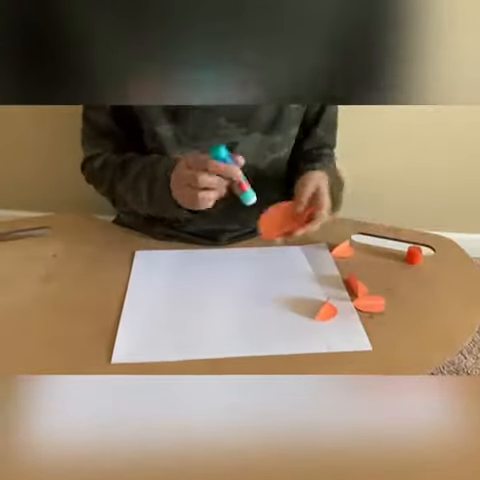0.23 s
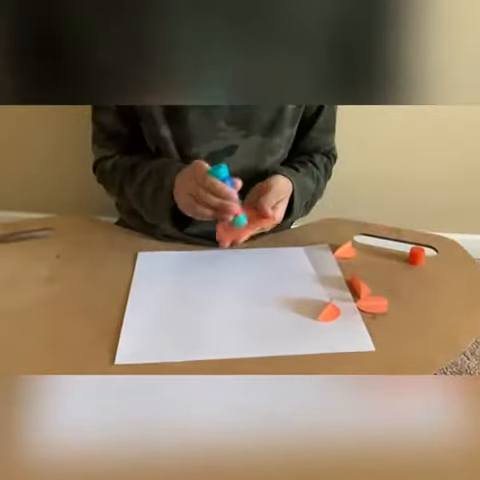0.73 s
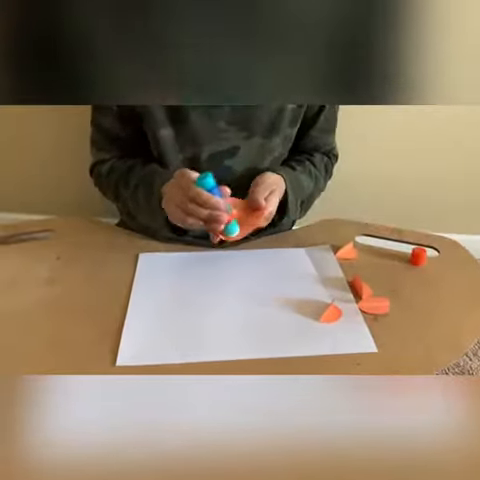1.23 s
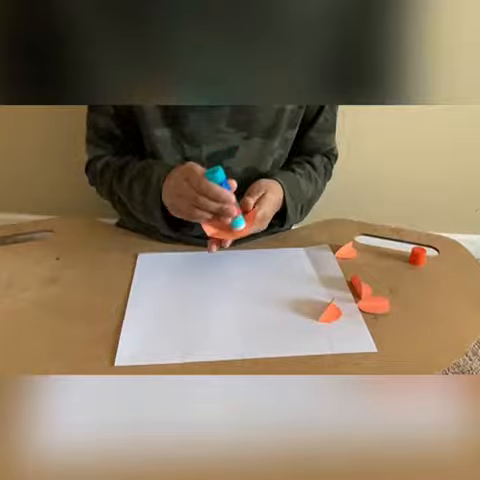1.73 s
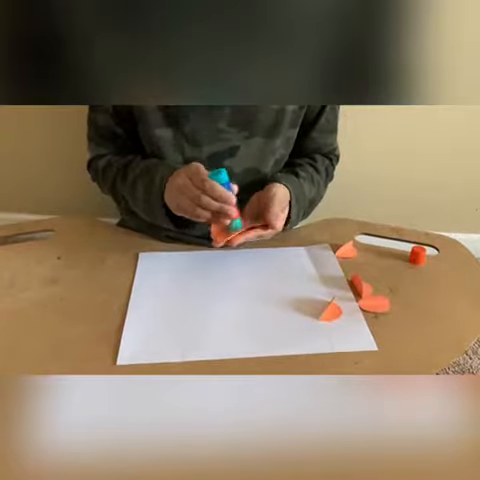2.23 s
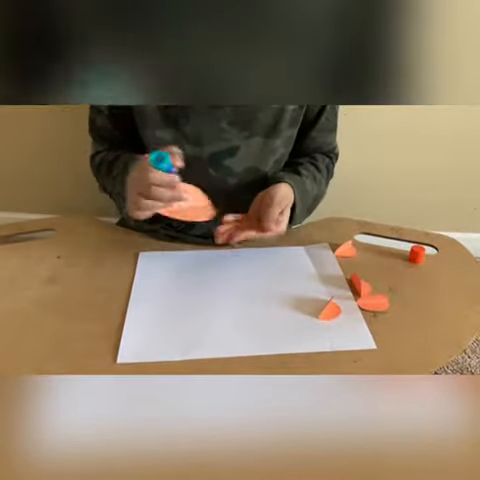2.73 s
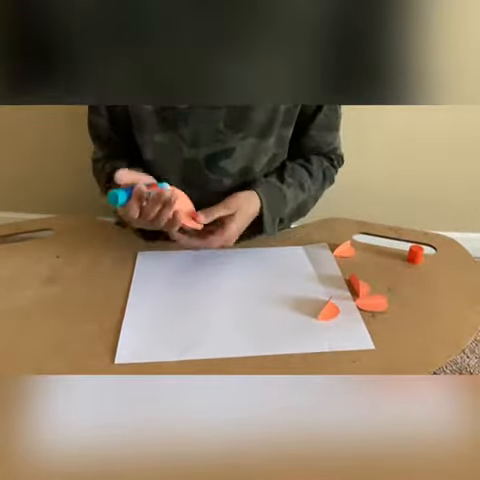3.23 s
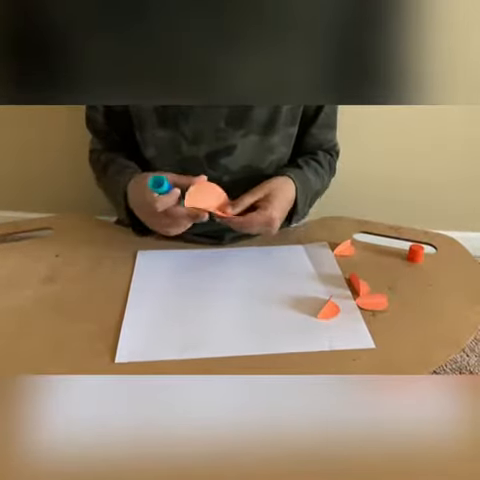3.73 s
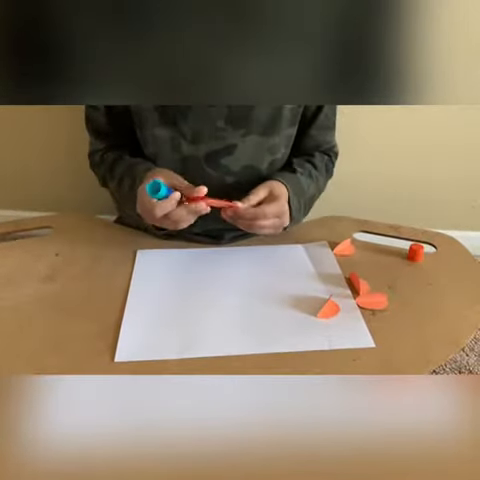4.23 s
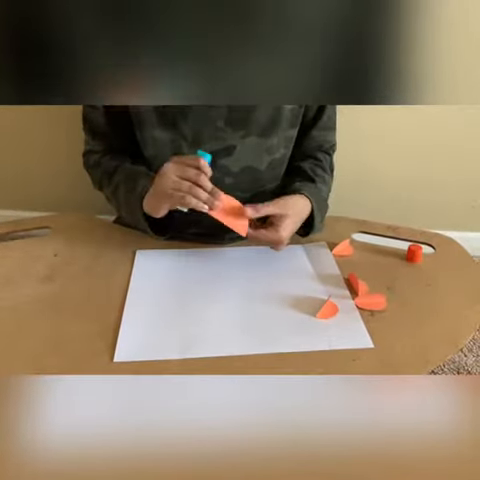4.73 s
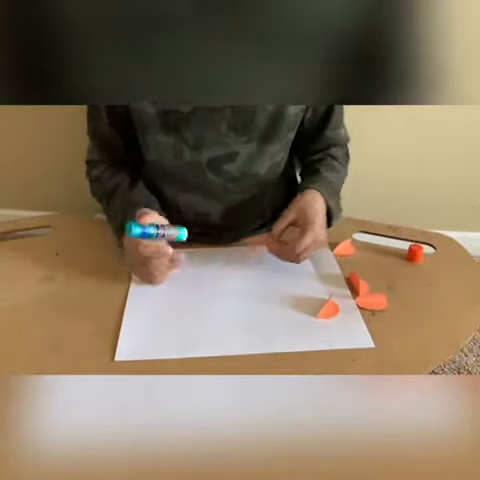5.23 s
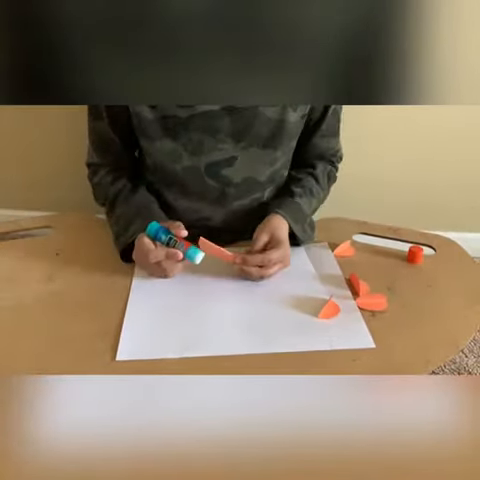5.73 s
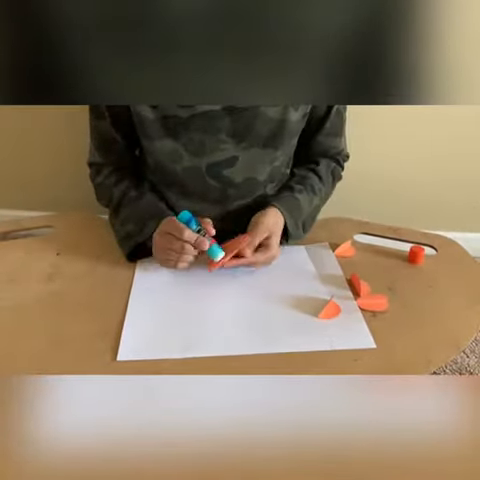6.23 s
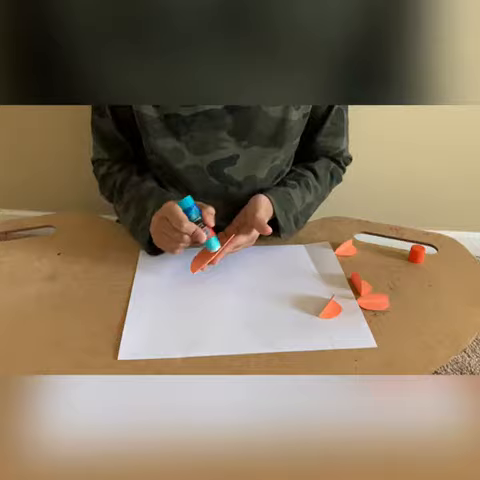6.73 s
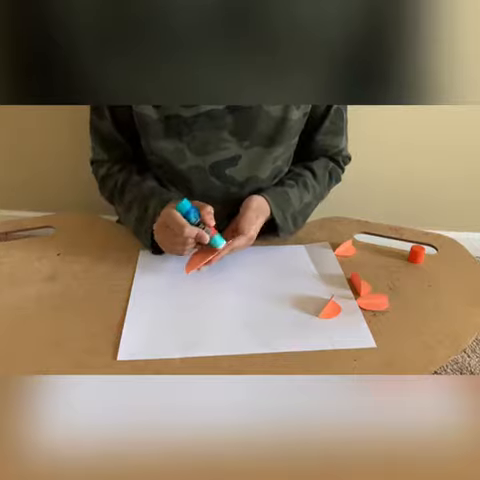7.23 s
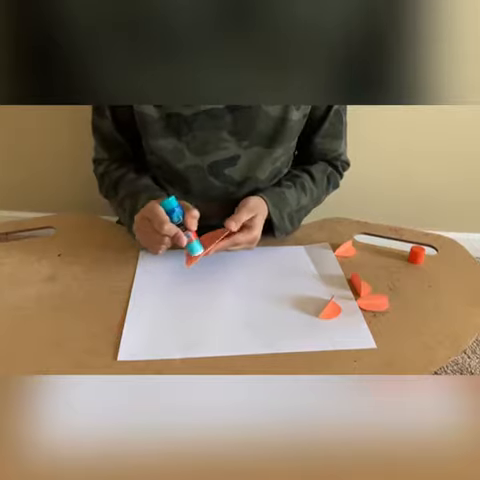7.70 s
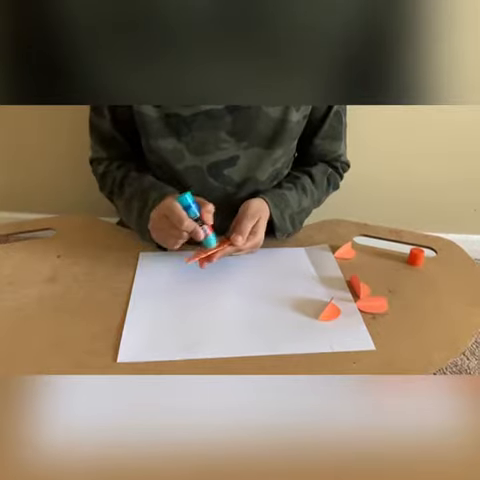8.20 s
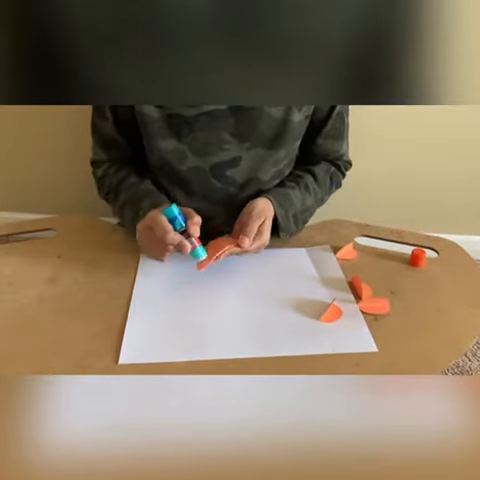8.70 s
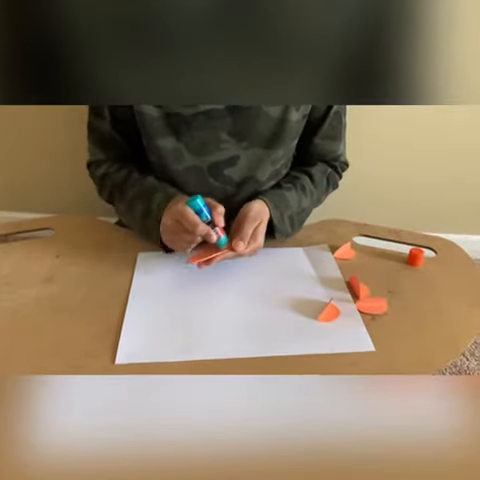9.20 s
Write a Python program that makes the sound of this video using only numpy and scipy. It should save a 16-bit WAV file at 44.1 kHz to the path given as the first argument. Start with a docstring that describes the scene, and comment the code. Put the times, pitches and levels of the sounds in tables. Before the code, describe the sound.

Paper rustles and ticks softly between fingers over a low electric hum, with dull wooden knocks and one loud hard double clack near the end.

```python
"""From the start, an electric hum fills a small room where someone dabs and rubs a glue stick on a paper shape.
Slipping fibres make the paper rustle, and short clicks of noise make it tick; sleeves brush the table softly.
Soon the tacky glue lets go with little pops, each ringing a few damped modes of the paper.
Later, dull wooden knocks come now and then, as bursts of reflections coloured like wood.
Near the end something hard comes down with one loud double clack that rings through the room; faint rubs follow.
"""
import sys
import numpy as np
from scipy import signal
from scipy.fft import rfft, irfft
from scipy.io import wavfile
from scipy.ndimage import uniform_filter1d

SR = 44100
rng = np.random.default_rng(int(sys.argv[2]) if len(sys.argv) > 2 else 0)


def wav_record(signal):
    """Record a signal, one row per channel, as 16-bit PCM in the file named by sys.argv[1]."""
    frames = np.transpose(np.atleast_2d(signal))
    bounded = np.clip(frames, -1, 1)
    # unit amplitude maps onto the largest positive 16-bit level
    quanta = np.round(bounded * 32767).astype(np.int16)
    wavfile.write(sys.argv[1], SR, quanta)


N = 417186  # length of the scene in samples

# The tone colour of the paper. Each row: frequency in Hz, gain in dB.
PAPER_COLOUR = [(200, -34), (600, -8), (1050, -10), (1450, -11), (1900, -9.5), (2700, -8.5), (3500, -4.5),
                (4500, -5), (5400, -5), (6600, -0.5), (8000, 5), (9300, 4.5), (10200, 1), (11200, 2)]


def amp(db):
    """Turns decibels into a gain."""
    return 10 ** (np.asarray(db) / 20)


def evened(x):
    """Scales a signal to an rms of 1."""
    return x / np.sqrt(np.mean(x ** 2) + 1e-24)


def read(points, hz):
    """Reads a table between its rows, along a log-frequency axis."""
    f, value = np.transpose(points)
    return np.interp(np.log(hz + 1), np.log(f + 1), value)


def bins(size):
    """Gives the frequencies in Hz of a real spectrum."""
    return np.fft.rfftfreq(size, 1 / SR)


def add(mix, s, sound):
    """Mixes a sound in at time s, in seconds."""
    part = mix[..., max(round(s * SR), 0):][..., :sound.shape[-1]]
    part += sound[..., :part.shape[-1]]


def balanced(pair, pan_db):
    """Makes the left side louder than the right by pan_db."""
    return pair * amp([[pan_db / 2], [-pan_db / 2]])


def filtered(x, gain):
    """Multiplies the spectrum of a full-length signal by a gain."""
    return irfft(rfft(x) * gain, N)


def drift(rate_hz, size=8192):
    """Makes a slow random curve of rms about 1, mostly below rate_hz."""
    hz = np.fft.rfftfreq(size, N / SR / size)
    slow = irfft(rfft(rng.standard_normal(size)) / (1 + (hz / rate_hz) ** 4))
    return evened(np.interp(np.linspace(0, size - 1, N), np.arange(size), slow))


def hump(hz, centre_hz, width):
    """Gain of a damped resonance whose width is a share of its pitch."""
    return 1 / (1 + ((hz / centre_hz - 1) / width) ** 2)


def impulse(db, size=4096):
    """Makes the click whose spectrum is db and whose energy comes as early as possible."""
    cepstrum = irfft(np.log(amp(np.maximum(db, db.max() - 90))))
    # folding the cepstrum onto its first half leaves nothing before the click
    cepstrum[1:size // 2] *= 2
    cepstrum[size // 2 + 1:] = 0
    return irfft(np.exp(rfft(cepstrum)))


def contact(db, chatter_s, chatter_db, size=4096):
    """A blow and the brief chatter after it, coloured by the spectrum db."""
    chatter = rng.standard_normal(size) * np.exp(-np.arange(size) / SR / chatter_s)
    force = amp(chatter_db) * chatter / np.linalg.norm(chatter)
    force[0] += 1
    # chatter spreads the blow in time but feeds all pitches alike
    force = irfft(np.exp(1j * np.angle(rfft(force, 2 * size))))[:size]
    return signal.fftconvolve(force, impulse(db))[:size]


def peaked(x, db, size=220):
    """Scales a hit so that its loudest 5 ms have the level db."""
    return amp(db) * x / np.sqrt(uniform_filter1d(x ** 2, size).max())


def arches(rows, power):
    """Loudness of sliding movements: each speeds up and slows down as half a sine, and swells and fades with it."""
    out = np.zeros(N)
    for middle, length, db in rows:
        edges = np.array([middle - length / 2, middle + length / 2])
        first, last = np.clip(edges * SR, 0, N).astype(int)
        speed = np.cos(np.pi * (np.arange(first, last) / SR - middle) / length)
        out[first:last] += amp(db) * abs(speed) ** power
    return out


def bending(x, patch_db, frames=14, order=7):
    """The sheet bends, so its resonances come and go in patches of time and pitch."""
    z = signal.stft(x, SR, nperseg=256)[2]
    patches = rng.standard_normal(z.shape)
    for _ in range(2):
        patches = uniform_filter1d(uniform_filter1d(patches, order, 0), frames, 1)
    return signal.istft(z * amp(patch_db * evened(patches)), SR, nperseg=256)[1][:N]


def partly_alike(pair):
    """Makes two unrelated signals partly alike: wide in the middle pitches, nearly the same in the treble."""
    # How alike left and right are. Each row: frequency in Hz, likeness from 0 to 1.
    likeness = [(60, .93), (170, .85), (300, .4), (700, .05), (1500, 0), (4500, .25), (6300, .97),
                (9000, 1)]
    size = pair.shape[1]
    a, b = rfft(pair)
    same = np.clip(read(likeness, bins(size)), 0, 1)
    mid = a * np.sqrt((1 + same) / 2)
    side = b * np.sqrt((1 - same) / 2)
    return irfft(np.array([mid + side, mid - side]), size)


def echoes(size=SR, frames=22, lump_db=3, order=3):
    """Dense reflections on both sides, arriving in brief clumps; each band dies at its own speed."""
    # How long the room rings. Each row: frequency in Hz, time to fall by 60 dB in seconds.
    decay_times = [(150, .45), (500, .47), (1000, .45), (2500, .43), (5000, .41), (8000, .34), (12000, .27)]
    z = signal.stft(rng.standard_normal((2, size)), SR, nperseg=256)[2]
    lumps = rng.standard_normal(z.shape[1:])
    lumps = evened(uniform_filter1d(uniform_filter1d(lumps, order, 0), order, 1))
    z = z * amp(lump_db * lumps)
    # even out the slower swings, so only the brief clumps stay
    z = z / np.sqrt(uniform_filter1d(abs(z) ** 2, frames, axis=2) + 1e-12)
    dense = signal.istft(z, SR, nperseg=256)[1][:, :size]
    hz, frame_s, z = signal.stft(partly_alike(dense), SR, nperseg=256)
    fade = np.exp(-np.log(1000) * frame_s / read(decay_times, hz)[:, None])
    return signal.istft(z * fade, SR, nperseg=256)[1][:, :size]


def in_room(x, wet_db, early_db, early_s, pan_db, lag_s=0):
    """Direct sound, later on the left if lag_s is set; near reflections; a tail that dies band by band."""
    t = np.arange(SR) / SR
    tail = echoes() * (t > .002)
    response = rfft(tail * (1 + amp(early_db) * np.exp(-t / early_s)), 2 * SR)
    # the walls return every band about equally
    response /= np.sqrt(uniform_filter1d(np.mean(abs(response) ** 2, 0), size=500) + 1e-12)
    wet = signal.fftconvolve(x[None], irfft(response)[:, :SR], axes=1)[:, :N]
    left = x
    if lag_s:
        # the lag turns the phase by one cycle at most, so the treble stays in step
        left = filtered(x, np.exp(-2j * np.pi * np.minimum(bins(N) * lag_s, 1)))
    return balanced(np.array([left, x]) + amp(wet_db) * wet, pan_db)


def background(waver_db=2.0, waver_turns=.015, pan_db=1):
    """A steady electric hum of wavering sines over the rumble and hiss of the room, made of coloured noise."""
    # Tones of the mains and a distant motor. Each row: pitch in Hz, level in dB before the waver and balance.
    hum_tones = [(41.7, -77), (58.1, -64.5), (84, -75.5), (120, -57.5), (155, -79), (174.3, -73.5),
                 (240, -81)]
    # Noise of the room. Each row: frequency in Hz, level in dB per Hz before the balance.
    air_colour = [(20, -93), (31, -89.5), (45, -88.5), (60, -80.5), (85, -82.5), (115, -85.5), (165, -88.5),
                  (250, -95), (400, -102), (520, -109), (780, -108), (1150, -116), (2300, -122),
                  (6500, -126), (11500, -124)]
    t = np.arange(N) / SR
    hum = np.zeros(N)
    for hz, db in hum_tones:
        loudness = np.sqrt(2) * amp(db + waver_db * drift(2.3))
        turns = hz * t + rng.random() + waver_turns * drift(0.93)
        hum += loudness * np.sin(2 * np.pi * turns)
    noise = partly_alike(rng.standard_normal((2, N)))
    air = filtered(noise, amp(read(air_colour, bins(N)))) * np.sqrt(SR / 2)
    return balanced(hum + air, pan_db)


def hum_wander(centre_hz=120, width=0.036, level_db=-68):
    """The strongest hum tone wanders between left and right: narrow noise, opposite on the two sides."""
    narrow = filtered(rng.standard_normal(N), hump(bins(N), centre_hz, width))
    wander = amp(level_db) * evened(narrow)
    return np.array([wander, -wander])


def sleeves(flutter_db=3.0, resting_db=-84.5):
    """Cloth drags unevenly over the table edge: fluttering noise, louder as the arm moves and never quite still."""
    # The dull colour of cloth. Each row: frequency in Hz, gain in dB.
    cloth_colour = [(100, -15.5), (280, 9), (520, -2.5), (780, -1.5), (1200, -14), (2200, -15.5),
                    (4000, -21.5), (12000, -44.5)]
    # A sleeve brushes the table. Each row: middle in seconds, length in seconds, level in dB before the room.
    brush_rows = [(.31, 0.24, -96), (3.82, 0.093, -81), (4.07, 0.071, -68), (4.76, 0.36, -83),
                  (5.3, 0.6, -76.5), (5.89, 0.22, -65.5), (6.17, 0.68, -81), (6.48, 0.2, -72),
                  (6.97, 0.23, -76.5), (8.69, 0.17, -80)]
    drag = filtered(rng.standard_normal(N), amp(read(cloth_colour, bins(N))))
    drag = evened(drag * amp(flutter_db * drift(40)))
    return drag * (amp(resting_db) + arches(brush_rows, power=1.55))


def knocks(rise_s=0.0013, early_db=2.5, early_s=.017, rebound_s=.024, rebound_db=-4, pan_db=0.0, size=22050):
    """Soft blows on wood, heard through the room: near reflections, a weaker rebound, then the tail."""
    # The blows, each with its own level, tilt and top; the faint row at 7.478 is the soft onset of the knock
    # after it. Each row: start in seconds, level in dB before the balance,
    # tilt in dB per octave (above 250 Hz), top in Hz.
    blow_rows = [(2.584, -50.5, 1.1, 8800), (2.988, -55.5, -5, 1950), (3.718, -53.5, -5, 2360),
                 (3.969, -58, -6.5, 2500), (4.336, -54.5, -4, 2580), (4.856, -49, -2.5, 8000),
                 (5.532, -66, 0.5, 2670), (5.728, -57.5, -4.5, 2800), (5.842, -58.5, -7, 1900),
                 (5.887, -76, 0, 2500), (6.056, -60, -6, 980), (6.158, -62, -15, 1000),
                 (7.328, -65.5, 3, 1930), (7.478, -63, 4.5, 6000), (7.488, -49.5, 3, 6300),
                 (7.9833, -53.5, -3.4, 2150), (8.642, -64, -9.5, 1993)]
    # The colour of the wood. Each row: frequency in Hz, gain in dB.
    wood_colour = [(90, -19.5), (200, -4.5), (290, -1), (410, 4.5), (540, -1.5), (680, 0), (900, 0.5),
                   (1100, -2.5), (1570, -4.5), (2300, -6.5), (3400, -17), (5200, -22), (8800, -25.5),
                   (12000, -32.5)]
    out, hz, t = np.zeros((2, N)), bins(4096), np.arange(size) / SR

    def burst(age):
        """A quick rise and a steep fall."""
        return (1 - np.exp(-np.maximum(age, 0) / rise_s)) / (1 + (age / early_s) ** 4)

    early = burst(t) + amp(rebound_db) * burst(t - rebound_s)
    swell = 1 - np.exp(-t / rise_s) + amp(early_db) * early
    for s, db, tilt, top_hz in blow_rows:
        colour = read(wood_colour, hz) + tilt * np.log2(np.maximum(hz, 250))
        colour -= 10 * np.log10(1 + (hz / top_hz) ** 8)
        blow = signal.fftconvolve(echoes(size) * swell, impulse(colour)[None], axes=1)
        # the level counts over the first 80 ms
        add(out, s, amp(db) * blow / blow[:, :round(.08 * SR)].std())
    return balanced(out, pan_db)


def clack(peak_width_hz=32, level_db=1, edge_db=5, edge_width=0.19):
    """A hard thing lands on one edge, then the other; all contacts share one colour, plus a pitch of the edge."""
    # The contacts. Each row: start in seconds, level in dB before level_db and the room, tilt in dB per octave,
    # chatter decay in seconds, chatter level in dB against the blow, pitch of the struck edge in Hz.
    contact_rows = [(7.5453, -33, -1.5, 0.013, 16, 2650), (7.5564, -15, 0.26, 0.00093, 1.5, 2580),
                    (7.56, -24, 3.5, 0.0018, 5.5, 2700), (7.5657, -15.5, 0, 0.0013, 2.5, 3500),
                    (7.5772, -26, -2, 0.0016, 12.5, 2700)]
    # The broad colour of the hard thing. Each row: frequency in Hz, gain in dB.
    hard_colour = [(100, -22), (300, -13), (400, -9.5), (500, -14), (650, -7), (800, -5.5), (1000, -2.5),
                   (1300, -5), (2000, -0.5), (2600, 2), (3100, -2), (3800, -0.5), (4500, -6), (5200, -4.5),
                   (6200, -13), (8000, -11.5), (10200, -18), (11200, -13.5), (12000, -24)]
    # Narrow peaks in the clack's colour, shared by all contacts.
    # Each row: frequency in Hz, height in dB above the broad colour.
    narrow_peaks = [(694, 8.5), (979, 7), (1420, 2.5), (2021, 3), (2345, 0), (2450, -0.5), (2578, 1),
                    (2792, 0.5), (3017, 3), (3430, 4.5), (3754, 2), (3888, 3.5), (5093, 4)]
    out, hz = np.zeros(N), bins(4096)
    body = read(hard_colour, hz)
    for f, db in narrow_peaks:
        body = body + db * hump(hz, f, peak_width_hz / f)
    for s, db, tilt, chatter_s, chatter_db, edge_hz in contact_rows:
        colour = body + tilt * np.log2(hz + 1) + edge_db * hump(hz, edge_hz, edge_width)
        add(out, s, peaked(contact(colour, chatter_s, chatter_db), db + level_db))
    return out


def shaded_clack(pair):
    """The clack comes from the right, so the left side is softer, band by band."""
    # Balance of the clack. Each row: frequency in Hz, left minus right in dB.
    side_balance = [(150, -0.5), (550, -3), (1000, -3), (2000, -1), (4000, -.5), (10000, -0.5)]
    half = amp(read(side_balance, bins(N)) / 2)
    return filtered(pair, np.array([half, 1 / half]))


def scuffs(width=.18, slips_per_s=600, level_db=0):
    """A paper edge skips over skin: short runs of uneven slips, each through one resonance of the sheet."""
    # The runs. Each row: start in seconds, length in seconds (at least 300 samples are used),
    # level in dB before the room, pitch in Hz.
    scuff_rows = [(0.28, 0.025, -74, 2500), (0.719, .05, -73, 2450), (1.546, 0.088, -73, 3200),
                  (3.308, 0.0072, -73.5, 2100), (3.798, 0.017, -67, 1710), (3.871, 0.018, -68.5, 4180),
                  (3.959, 0.039, -64.5, 4300), (4.757, 0.034, -71, 3960), (5.167, .035, -71.5, 2160),
                  (5.341, 0.015, -73, 1580), (6.004, 0.042, -74.5, 1530), (6.113, 0.034, -68, 2350),
                  (6.681, 0.017, -72.5, 1130), (7.33, 0.049, -72, 1580), (8.344, 0.011, -67, 4620),
                  (8.563, 0.007, -71.5, 5100)]
    out, hz = np.zeros(N), bins(4096)
    for s, length, db, pitch in scuff_rows:
        size = max(round(length * SR), 300)
        slips = rng.standard_normal(size) * (.15 + (rng.random(size) < slips_per_s / SR))
        sheet = impulse(20 * np.log10(hump(hz, pitch, width)))
        add(out, s, peaked(signal.fftconvolve(slips, sheet), db + level_db))
    return out


def rustle(voice_hz=3500, slips_per_s=1600, clump_db=3, arch_power=2.21):
    """Many fibres catch and slip in soft clumps; pressing harder makes the whole sheet speak."""
    # Paper slides between the fingers. Each row: middle in seconds, length in seconds, level in dB before the
    # room, extra level of the low voice from pressing in dB.
    stroke_rows = [(0.001, 0.12, -55.5, 6.5), (0.164, 0.076, -64, -9), (0.274, 0.11, -75, 21.5),
                   (0.328, 0.053, -64.5, 2), (0.402, 0.096, -59.5, 4.5), (0.52, 0.2, -69, 6),
                   (0.694, 0.06, -54.5, -2), (0.807, 0.15, -68, 2), (1.214, 0.16, -59.5, -3),
                   (1.366, 0.17, -60, 0.5), (1.481, 0.12, -54, 12.5), (1.538, 0.21, -80, 28),
                   (2.107, 0.19, -57, 2), (2.273, 0.027, -73.5, -5), (2.336, 0.046, -75, 8),
                   (2.544, 0.11, -66.5, 11.5), (2.935, 0.1, -76, -3), (3.224, 0.097, -75.5, 18),
                   (3.744, 0.047, -74, -7), (3.824, 0.22, -69.5, 10.5), (3.976, 0.058, -54.5, -1),
                   (4.116, 0.25, -67, 1), (4.362, 0.036, -60.5, 5), (4.418, 0.075, -65, 7.5),
                   (4.657, 0.15, -75.5, 3), (4.76, 0.11, -60.5, 8.5), (4.92, 0.037, -57, -14),
                   (4.975, 0.27, -62.5, -26), (5.152, 0.22, -55, -6), (5.253, 0.1, -66, -12),
                   (5.525, 0.13, -69.5, 4), (5.656, 0.27, -63, -22), (5.766, 0.044, -65, -20),
                   (5.868, .14, -58, -21), (6.032, 0.08, -63.5, 1), (6.146, 0.18, -53, -5),
                   (6.266, .17, -73, 5), (6.412, 0.089, -61.5, -5), (6.501, 0.063, -58, -3),
                   (6.66, 0.05, -73.5, -6), (7.263, .07, -79, -3), (8.386, 0.12, -83, 21),
                   (8.7, .14, -91, 7), (9.274, 0.15, -78.5, 6)]
    hz = bins(N)
    sizes = amp(3.5 * np.minimum(rng.exponential(1, N), 3.5)) * rng.choice([-1, 1], N)
    caught = rng.random(N) < slips_per_s / SR
    slips = bending(sizes * caught * amp(clump_db * drift(48)), patch_db=3)
    z = rfft(slips) * amp(read(PAPER_COLOUR, hz))
    low_share = 1 / (1 + (hz / voice_hz) ** 4)
    fizz = irfft(z * (1 - low_share), N)
    voice = irfft(z * low_share, N)
    sliding = arches([(s, length, db) for s, length, db, _ in stroke_rows], arch_power)
    pressing = arches([(s, length, db + low_db) for s, length, db, low_db in stroke_rows], arch_power)
    return (fizz * sliding + voice * pressing) / fizz.std()


def ticks(level_db=-8.0, voice_hz=4500, top_hz=11000, top_db=-7):
    """Small snaps of the buckling paper, softer at the very top than its rustle."""
    # The snaps. Each row: start in seconds, level in dB before level_db and the room,
    # boost of the low voice against the treble in dB.
    snap_rows = [(0.2545, -55, 23), (0.378, -57, -8), (0.4133, -57, -4), (0.5144, -48, -6),
                 (0.684, -57, 22), (0.8075, -51, -17), (1.1284, -59, 6), (1.4527, -52, -15),
                 (1.5984, -46, 1), (2.1106, -36.5, -10.5), (2.5326, -51.5, 8), (3.0705, -40.5, 25),
                 (3.217, -60, 2), (3.596, -58.5, 10), (3.8717, -50, -16), (3.9604, -56, -10),
                 (4.1523, -44.5, 2), (4.4293, -49, 3), (4.6807, -53, 3), (4.7502, -46, -2),
                 (4.7858, -48.5, 1.5), (4.9077, -43, -8), (5.759, -50, -17), (5.864, -60, 0),
                 (5.9319, -57, 7), (6.408, -53, -10), (7.2992, -61.5, -4), (8.346, -62, 10),
                 (8.5649, -63.5, 0)]
    out, hz = np.zeros(N), bins(4096)
    sheet = read(PAPER_COLOUR, hz) + top_db * (1 - 1 / (1 + (hz / top_hz) ** 8))
    for s, db, low_db in snap_rows:
        colour = sheet + low_db / (1 + (hz / voice_hz) ** 4)
        add(out, s, peaked(contact(colour, chatter_s=0.0017, chatter_db=3.5), db + level_db))
    return out


def pops(width=.15, level_db=-2):
    """The tacky glue lets go and the paper, damped by the palm, rings for a few cycles."""
    # The glue stick meets or leaves the paper. Each row: start in seconds, level in dB before level_db and
    # the room, pitch of the flexing paper in Hz, level of its upper modes in dB.
    pop_rows = [(0.4174, -54.5, 720, -6), (0.6934, -43.5, 940, 8.5), (0.704, -46, 2380, -27),
                (.803, -66, 980, -13.5), (1.058, -51.5, 780, -16), (1.4755, -51, 1070, -5),
                (1.488, -53.5, 980, 1), (1.505, -58, 1100, 11), (1.599, -61.5, 1070, -6),
                (2.162, -57.5, 690, -7), (3.0693, -56.5, 930, 12), (4.082, -55.5, 794, -7),
                (4.154, -61, 650, -3), (5.888, -53.5, 770, -4), (5.917, -59, 735, 7), (5.934, -69, 760, 2)]
    # Upper modes of the paper. Each row: multiple of its pitch, level in dB added to that of the upper modes.
    flex_modes = [(1.55, -16.5), (2.45, -14.5), (3.9, -24)]
    out, hz = np.zeros(N), bins(4096)
    for s, db, pitch, upper_db in pop_rows:
        modes = hump(hz, pitch, width)
        for multiple, mode_db in flex_modes:
            modes = modes + amp(upper_db + mode_db) * hump(hz, pitch * multiple, width)
        pop = contact(20 * np.log10(modes), chatter_s=0.0046, chatter_db=3.0)
        add(out, s, peaked(pop, db + level_db))
    return out


def scene():
    """Paper and glue are close and fairly dry; the knocks and the clack fill the room."""
    sliding = rustle() + scuffs() + sleeves()
    paper = in_room(sliding, wet_db=-5.0, early_db=2.5, early_s=.02, pan_db=0.24)
    snaps = in_room(ticks(), wet_db=-3.0, early_db=13, early_s=0.018, pan_db=2.0)
    glue = in_room(pops(), wet_db=-4, early_db=6.5, early_s=.022, pan_db=2.0)
    # from the right, so the clack reaches the left side later
    hard = in_room(clack(), wet_db=1.0, early_db=5.0, early_s=0.023, pan_db=-0.2, lag_s=0.00021)
    return background() + hum_wander() + knocks() + shaded_clack(hard) + paper + snaps + glue


def record(dry):
    """The recorder turns the phase of left against right, mostly in the treble; then the band ends near 11750 Hz."""
    # Left-right phase. Each row: frequency in Hz, radians by which the left leads.
    side_phase = [(20, 0), (2100, 0), (2600, 1.3), (3500, 1.0), (4400, .3), (4800, .6), (5300, 2.5),
                  (5850, 2.5), (6400, .3), (7400, -.2), (8500, -2.9), (9550, -3.3), (10500, -5.8),
                  (11500, -6.1)]
    turn = np.exp(.5j * read(side_phase, bins(N)))
    turned = filtered(dry, np.array([turn, turn.conj()]))
    low_pass = signal.firwin(301, 11750, window=("kaiser", 9), fs=SR)
    return signal.oaconvolve(turned, low_pass[None], "same")


dry = scene()
out = record(dry)
wav_record(out)
```